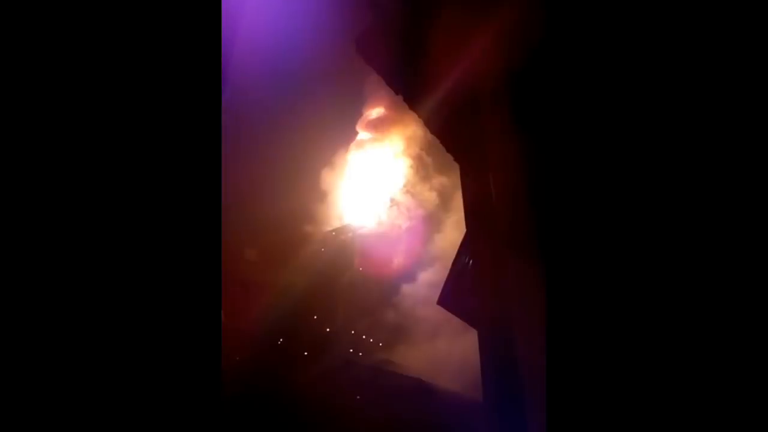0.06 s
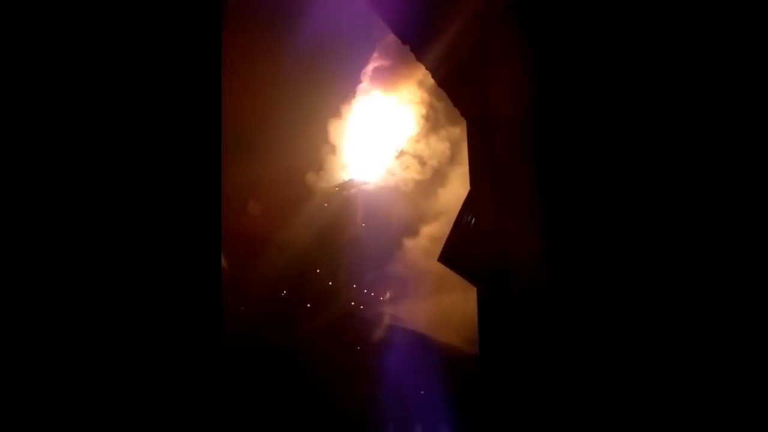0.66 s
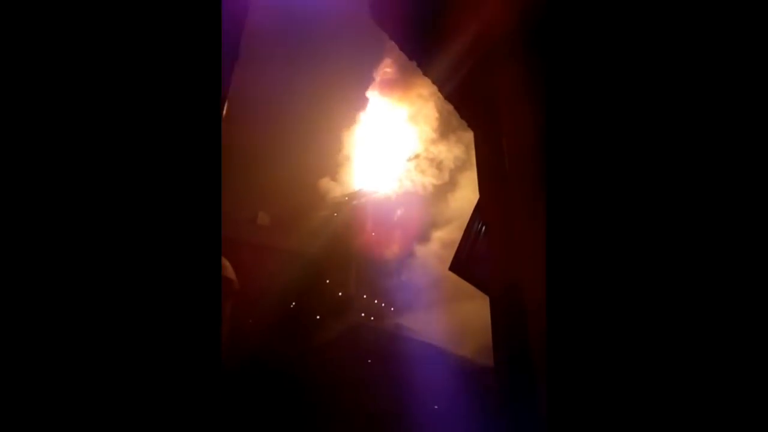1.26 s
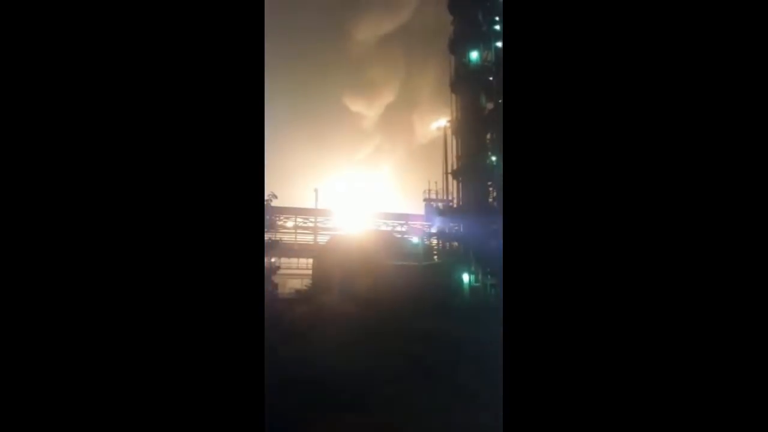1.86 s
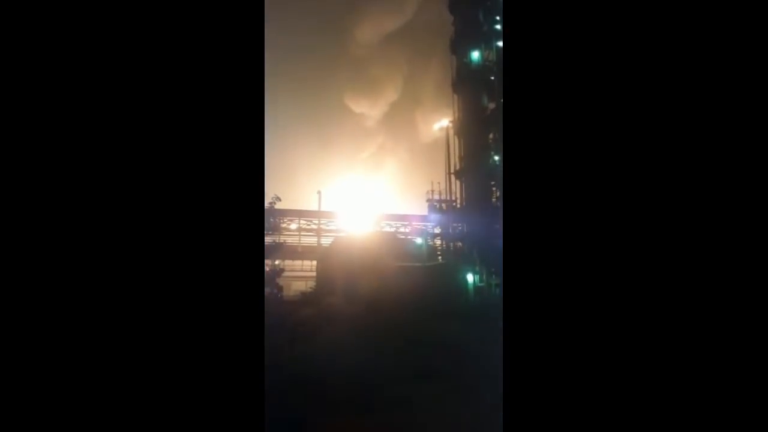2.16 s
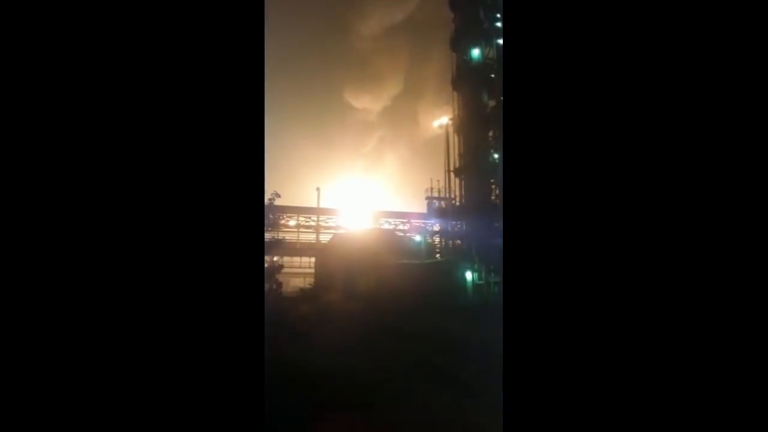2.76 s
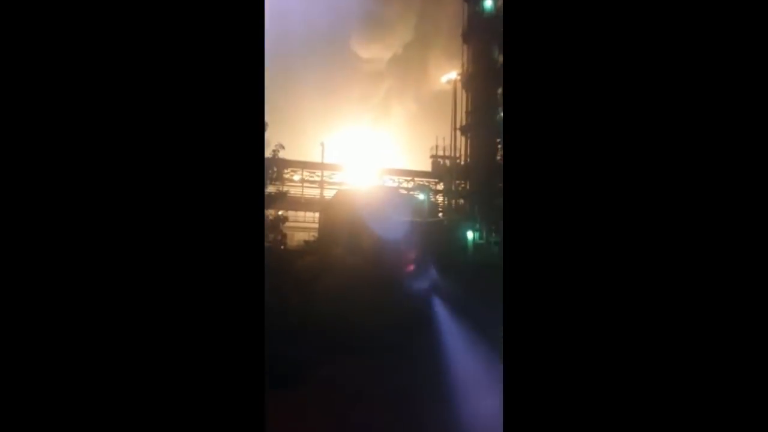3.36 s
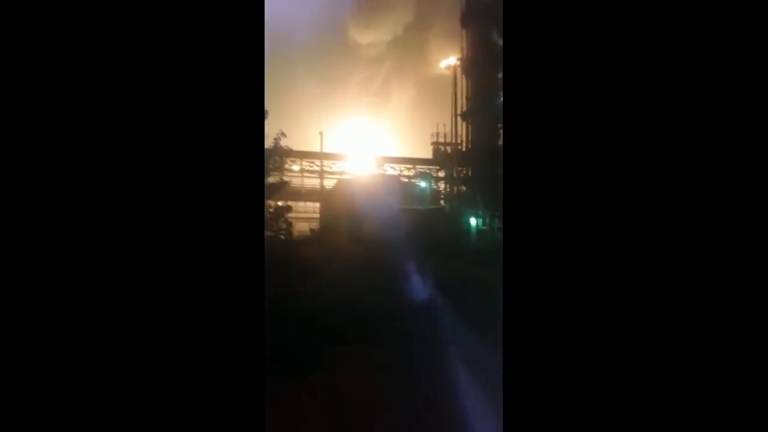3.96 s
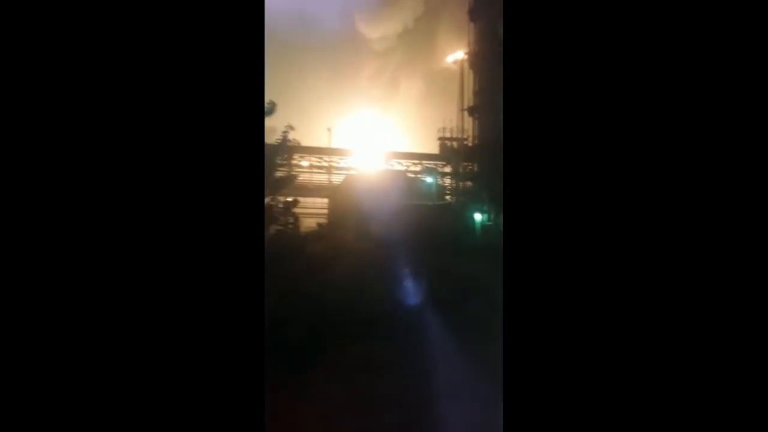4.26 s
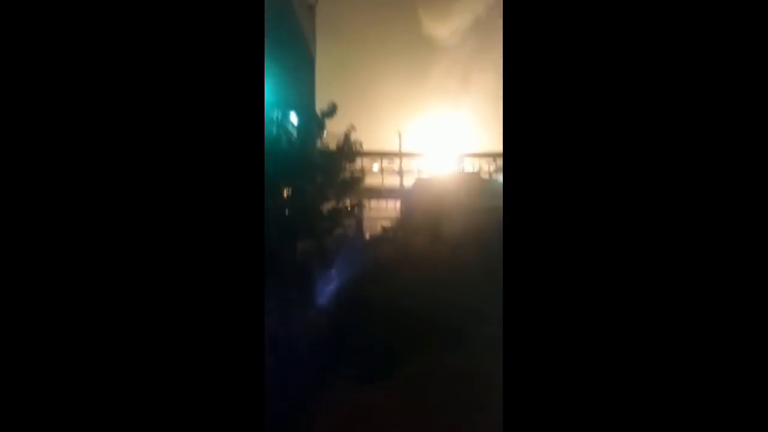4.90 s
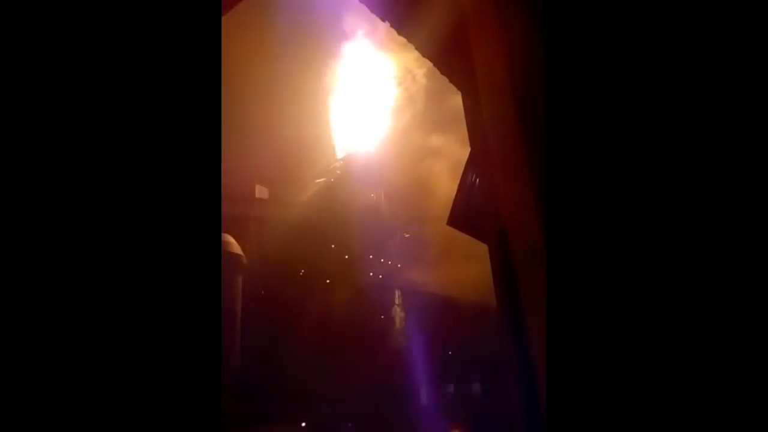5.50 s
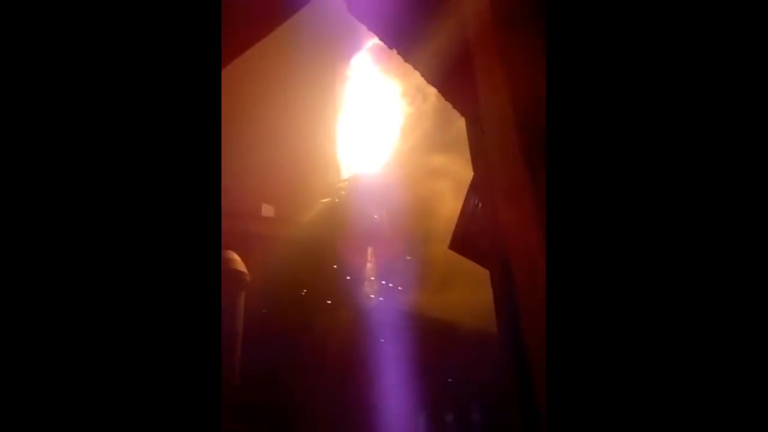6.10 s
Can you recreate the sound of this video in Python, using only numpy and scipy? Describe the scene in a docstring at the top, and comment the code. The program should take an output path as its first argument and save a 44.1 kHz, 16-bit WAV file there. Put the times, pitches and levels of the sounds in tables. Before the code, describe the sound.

The loud, rasping roar of burning gas at an industrial plant, heard near, then farther away with faint howls, then near again.

```python
"""A huge gas fire roars at an industrial plant, heard from three spots in turn, with short fades between.
Jet turbulence and a hail of small shocks make the roar; the flame body throbs underneath.
Close by, the jet rasps among reflecting steelwork, and the overloaded microphone adds a treble sizzle.
Across the plant, air absorption leaves the fire duller, with a booming flame, a thin hiss and a faint
wavering howl. Then it swells up close again."""
import sys
import numpy as np
from scipy.fft import rfft, irfft, next_fast_len
from scipy.io import wavfile
from scipy.ndimage import uniform_filter1d, minimum_filter1d, map_coordinates

SR = 44100
rng = np.random.default_rng(int(sys.argv[2]) if len(sys.argv) > 2 else 0)


def materialize(psi):
    """Save the field psi as 16-bit PCM at rate SR to the path in sys.argv[1].

    A 1-D psi becomes a single channel; in a 2-D psi each row is a channel.
    """
    bounded = np.clip(np.atleast_2d(psi).T, -1, 1)
    quanta = np.round(bounded * 32767).astype(np.int16)
    wavfile.write(sys.argv[1], SR, quanta)


N = 275184
TIME = np.arange(N) / SR

# Spectra of the jet at each spot, of the gas hiss and of the overloaded microphone's sizzle.
# Each row: frequency in Hz, relative spectral density in dB.
NEAR_SPECTRUM = [(20, -21), (50, -33), (90, -11.5), (170, -5), (450, -8), (750, -12), (1400, -5.5),
                 (2300, -15), (3100, -16.5), (3700, -24), (6700, -33.5), (8200, -51), (11000, -64.5),
                 (15500, -56)]
FAR_SPECTRUM = [(20, -35), (55, -18), (95, -12.5), (155, -1.5), (250, -12), (520, -9), (1200, -15),
                (2200, -21), (3500, -27), (4400, -35.5), (6900, -66), (9700, -63), (12000, -69),
                (15500, -69)]
LAST_SPECTRUM = [(20, -18), (50, -26), (140, -2.5), (330, -1.5), (750, -4.5), (1700, -12.5), (2600, -16.5),
                 (3400, -21), (4600, -23), (6700, -35.5), (8000, -49), (9500, -51), (12000, -63),
                 (15500, -58)]
HISS_SPECTRUM = [(6000, -34), (7500, -9.5), (8400, -3.5), (9000, -1.5), (9500, -0.5), (10000, -3),
                 (10600, 1), (11200, -7.5), (15300, -6.5)]
SIZZLE_SPECTRUM = [(3000, -21), (7000, 5.5), (9500, 4.5), (12000, -3), (14000, -5.5), (14900, 4.5),
                   (15600, -4.5)]
# Peaks and notches from steelwork and walls. Each row: centre in Hz, width in Hz, gain in dB.
NEAR_PEAKS = [(221, 22, -4.5), (243, 12, 0.5), (332, 18, 4), (496, 19, 2.5), (538, 24, 6.5), (596, 20, 8),
              (648, 20, -3.5), (930, 14, -6.5), (1168, 43, 4), (1448, 17, 6.5), (1580, 30, 2.5),
              (1944, 17, 4.5), (2140, 22, -6), (2800, 40, -2.5), (3250, 80, -3.5), (4242, 170, 3),
              (4905, 40, 4)]
FAR_PEAKS = [(335, 24, 5), (586, 17, 1), (784, 23, 3.5), (924, 33, -5), (1174, 130, 3.5), (1460, 54, -2.5),
             (1570, 49, 3.5), (1693, 85, 4.5), (1940, 80, -2), (2135, 67, 3.5), (5200, 160, 1.5),
             (5770, 160, 2.5), (6277, 160, 2), (6751, 160, 2)]
LAST_PEAKS = [(142, 17, 2.5), (240, 14, 5), (252, 14, -16), (337, 47, 3.5), (404, 16, -12), (460, 36, 3.5),
              (500, 20, -6.5), (577, 23, 4.5), (680, 45, 4), (1370, 18, 9.5), (1430, 22, 6), (1650, 35, 9),
              (2040, 22, 6.5), (2600, 44, 4.5), (3000, 40, -5), (3550, 87, -9), (3900, 40, 2),
              (4090, 100, 3.5), (4170, 40, -7), (5879, 40, 8), (6740, 40, 11)]
# Force of the jet at the first spot. Each row: time in seconds, relative level in dB.
NEAR_FORCE = [(0, -7.5), (.45, -8.5), (.78, -11), (.98, -8.5), (1.09, -9.5), (1.25, -8)]
# The fire at the other spots. Each row: time in seconds, jet force in dB, flame boom in dB.
FAR_FORCE_AND_BOOM = [(1.55, -17.3, -23), (2.0, -17, -23.5), (2.4, -15.5, -20.5), (2.95, -15, -15),
                      (3.8, -15, -17), (4.2, -14.5, -16), (4.7, -13.5, -19.5), (5.23, -14, -20)]
LAST_FORCE_AND_BOOM = [(5.5, -15.5, -20), (5.6, -14.5, -22), (5.7, -11, -18), (5.91, -9, -12),
                       (6.05, -10, -17), (6.24, -10, -18.5)]
# Faint, far howls. Each row: loudest moment in seconds, half length in seconds, pitch in Hz,
# glide in Hz per second, level in dB.
HOWLS = [(3.92, .14, 450, -80, -24), (4.198, .26, 563, 1, -25), (4.42, 0.2, 535.4, -230, -20.5),
         (4.46, .14, 444, -58.5, -23.5), (4.69, .09, 567, 0.5, -20), (4.83, 0.081, 559, -200, -13),
         (5.04, 0.09, 738, -480, -19), (5.17, 0.17, 548, 5, -23), (5.2, 0.048, 1262, -100, -21.5)]
# Bursts of overload sizzle close by, and swells of the treble across the plant.
# Each row: centre in seconds, half length in seconds, boost in dB.
SIZZLE_BURSTS = [(.03, .05, 5), (.46, .05, 4), (1.36, .09, 2), (5.835, .05, 10.5), (5.96, .03, 7.5),
                 (6.08, .025, 5.5)]
FAR_TREBLE_SWELLS = [(1.8, 0.14, 4), (4.1, .2, 1.3), (4.88, 0.041, 4)]

RUMBLE_GROWS, SIZZLE_GROWS = 1.4, 3.3  # dB per dB of jet force, close by
# The far microphone turns slowly to the fire and away, and once swings quickly.
FACING_S, SWING_S = (3.41, 1.45), (4.62, 0.067)  # each: centre, half length


def amp(db):
    """Amplitude ratio of a level in decibels."""
    return 10 ** (np.asarray(db) / 20)


def unit(x):
    """Normalisation to rms 1."""
    return x / np.sqrt(np.mean(x ** 2) + 1e-20)


def curves(rows):
    """Linear interpolation in time of each column after the first."""
    times, *columns = np.transpose(rows)
    return [np.interp(TIME, times, column) for column in columns]


def window(start, end, rise, fall):
    """A trapezoidal gate between start and end, in seconds."""
    return np.clip((TIME - start) / rise, 0, 1) * np.clip((end - TIME) / fall, 0, 1)


def after(start):
    """Seconds elapsed since start, 0 before it."""
    return np.maximum(TIME - start, 0)


def fade_out(start, duck_db, duck_s, db_per_s):
    """Exponential decay, steeper during an opening duck."""
    return amp(-duck_db * np.minimum(after(start) / duck_s, 1) - db_per_s * after(start))


def bell(centre_s, half_s):
    """A Gaussian of height 1, down to 1/e at half_s from its centre."""
    return np.exp(-((TIME - centre_s) / half_s) ** 2)


def swells(rows):
    """Superposed Gaussian boosts, in dB."""
    return sum(db * bell(centre_s, half_s) for centre_s, half_s, db in rows)


def wobble(rate):
    """Smooth random modulation through rate knots a second."""
    return map_coordinates(rng.standard_normal(int(N * rate / SR) + 4), [TIME * rate])


def follow(force_db, grows, top_db):
    """A power law ties a layer's level to the jet's force, reaching top_db at full force."""
    return top_db + grows * (force_db - force_db.max())


def impulses(rate):
    """A Poisson process: sharp pulses of random size, on average rate a second."""
    return unit((rng.random(N) < rate / SR) * rng.standard_normal(N))


def filtered(x, response):
    """Linear filtering: the spectrum is multiplied by a frequency response."""
    size = next_fast_len(N + 8192)
    return irfft(rfft(x, size) * response(np.fft.rfftfreq(size, 1 / SR)), size)[:N]


def lowpass(x, edge_hz, order):
    """Zero-phase attenuation above the edge."""
    return filtered(x, lambda hz: 1 / (1 + (hz / edge_hz) ** order))


def contour(spectrum, hz):
    """Gain of a spectral envelope, interpolated in log frequency."""
    knots_hz, db = np.transpose(spectrum)
    return amp(np.interp(np.log(hz + 1), np.log(knots_hz), db))


def resonance(hz, centre_hz, width_hz):
    """A Lorentzian curve of height 1."""
    return 1 / (1 + (2 * (hz - centre_hz) / width_hz) ** 2)


def steelwork(peaks, hz):
    """Reflections from steel and walls reinforce or cancel narrow bands."""
    return amp(sum(db * resonance(hz, centre, width) for centre, width, db in peaks))


def pipework(x, echo_db, count=10):
    """Comb filtering: weak echoes from pipes and walls interfere with the direct sound."""
    delays_s = rng.uniform(.008, .07, count)
    echoes = sum(np.roll(x, int(delay * SR)) for delay in delays_s)
    return unit(x + amp(echo_db) * echoes)


def hiss(level_db):
    """High-band noise gives the faint, smooth hiss of gas."""
    return amp(level_db) * unit(filtered(rng.standard_normal(N), lambda hz: contour(HISS_SPECTRUM, hz)))


def ring(centre_hz, width_hz, level_db):
    """Narrow-band noise is heard as a whistle while the microphone faces the fire."""
    band = filtered(rng.standard_normal(N), lambda hz: resonance(hz, centre_hz, width_hz))
    return amp(level_db) * bell(*FACING_S) * unit(band)


def howls(blur):
    """Multipath propagation through the plant smears gliding tones in amplitude and phase."""
    out = np.zeros(N)
    for centre_s, half_s, pitch_hz, glide, db in HOWLS:
        phase = 2 * np.pi * np.cumsum(pitch_hz + glide * (TIME - centre_s)) / SR
        paths = 1 + blur * (wobble(40) + 1j * wobble(40))
        out += amp(db) * bell(centre_s, half_s) * unit(np.real(paths * np.exp(1j * phase)))
    return out


def overload_sizzle(level_db, rate, fizz, sputter_db):
    """Clipping distortion: pulses and noise stand for the overloaded microphone's sizzle and fizz."""
    sputter = impulses(rate) * amp(sputter_db * unit(wobble(70) + wobble(13)))
    sizzle = sputter + fizz * rng.standard_normal(N)
    treble = filtered(sizzle, lambda hz: contour(SIZZLE_SPECTRUM, hz))
    return amp(level_db + swells(SIZZLE_BURSTS)) * unit(treble)


def jet(roar_db, rumble_db, spectrum, peaks, rasp, shock_rate, echo_db, flutter_db, throb_db):
    """Turbulence and small shocks radiate a broadband roar; the flame body throbs underneath."""
    flow = unit(rng.standard_normal(N) + rasp * impulses(shock_rate))
    heard = filtered(flow, lambda hz: contour(spectrum, hz) * steelwork(peaks, hz))
    rumble = lowpass(heard, edge_hz=300, order=8)
    eddies = unit(wobble(45) + wobble(130))  # large and small eddies shake the whole roar at once
    roar = unit(pipework(heard - rumble, echo_db) * amp(flutter_db * eddies))
    flame = unit(rumble * amp(throb_db * wobble(30)))
    return amp(roar_db) * roar + amp(rumble_db) * flame


def far_fire():
    """Air absorption takes the treble, so the boom stands out; directivity shades the upper bands."""
    force_db, boom_db = curves(FAR_FORCE_AND_BOOM)
    fire = jet(force_db, boom_db, FAR_SPECTRUM, FAR_PEAKS,
               rasp=0.37, shock_rate=1200, echo_db=-25, flutter_db=0.63, throb_db=-0.3)
    low = lowpass(fire, 720, order=6)
    body = lowpass(fire, 2500, order=6)
    away = 1 - bell(*FACING_S)  # 0 when the microphone faces the fire
    middle = amp(1.68 - 2.5 * away) * (body - low)
    treble = amp(1.4 - 2.5 * away + swells(FAR_TREBLE_SWELLS)) * lowpass(fire - body, 7800, order=12)
    whistle = ring(centre_hz=2150, width_hz=130, level_db=-31.5)
    swing_shade = amp(-3.5 * bell(*SWING_S))
    upper = swing_shade * (middle + treble + whistle + hiss(level_db=-58 - 13 * away))
    fade = fade_out(5.239, duck_db=7.1, duck_s=0.013, db_per_s=157)
    return (low + upper + howls(blur=.45)) * fade * window(1.535, 5.415, .003, 0.017)


def near_fire():
    """Close by the jet is harsh; its rumble and the microphone's sizzle follow its force by power laws."""
    force_db, = curves(NEAR_FORCE)
    rumble_db = follow(force_db, RUMBLE_GROWS, top_db=-12.0)
    fire = jet(force_db + 1.0, rumble_db, NEAR_SPECTRUM, NEAR_PEAKS,
               rasp=0.38, shock_rate=1400, echo_db=-21, flutter_db=0.53, throb_db=0.0)
    sizzle_db = follow(force_db, SIZZLE_GROWS, top_db=-45)
    sizzle = overload_sizzle(sizzle_db, rate=400, fizz=.35, sputter_db=3.6)
    fade = fade_out(1.309, duck_db=5.7, duck_s=.035, db_per_s=64)
    return (lowpass(fire, 13000, order=8) + sizzle) * fade * window(-1, 1.508, .01, .025)


def last_fire(start_s=5.423, rise_db=21, rise_s=0.057):
    """Close again, the jet surges; the microphone's nonlinear sizzle grows faster than the roar."""
    force_db, boom_db = curves(LAST_FORCE_AND_BOOM)
    fire = jet(force_db, boom_db, LAST_SPECTRUM, LAST_PEAKS,
               rasp=0.4, shock_rate=1400, echo_db=-21, flutter_db=0.7, throb_db=2.0)
    sizzle_db = follow(force_db, SIZZLE_GROWS, top_db=-51.5)
    sizzle = overload_sizzle(sizzle_db, rate=600, fizz=.5, sputter_db=3.5)
    fade_in = amp(-rise_db * np.exp(-after(start_s) / rise_s))
    return (lowpass(fire, 11000, order=8) + sizzle) * fade_in * window(start_s, 7, .004, .01)


def scene():
    """Superposition of the three spots, each gated to its own span of time."""
    return (near_fire() + far_fire() + last_fire())[None]


def record(dry):
    """Fast limiting holds the tallest peaks at full scale; a band limit follows."""
    top_hz = 15600
    needed_gain = 1 / np.maximum(np.abs(dry[0]), 1)
    held_gain = minimum_filter1d(needed_gain, size=25)
    smooth_gain = uniform_filter1d(uniform_filter1d(held_gain, size=13), size=13)
    return filtered(dry[0] * smooth_gain, lambda hz: hz < top_hz)[None]


dry = scene()
out = record(dry)
materialize(out)
```